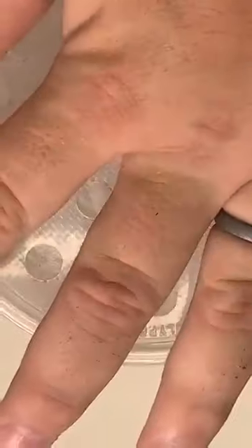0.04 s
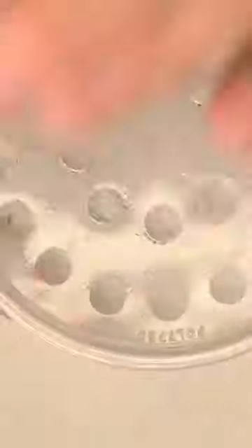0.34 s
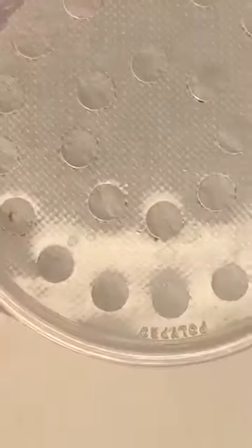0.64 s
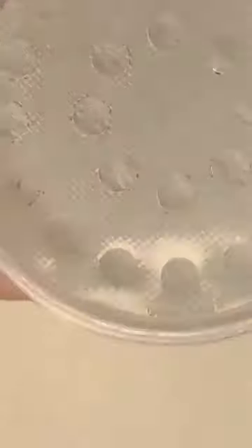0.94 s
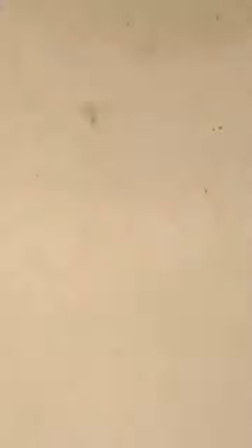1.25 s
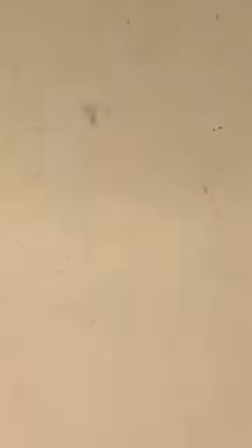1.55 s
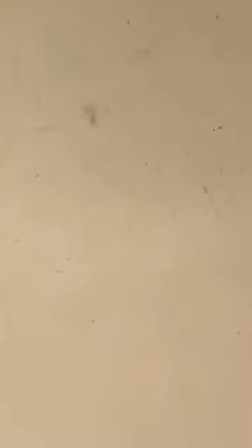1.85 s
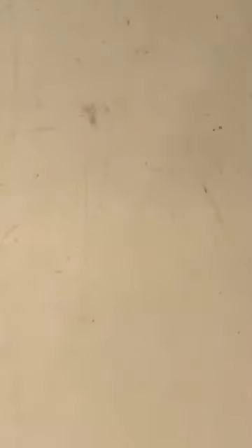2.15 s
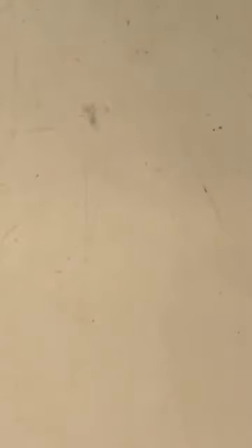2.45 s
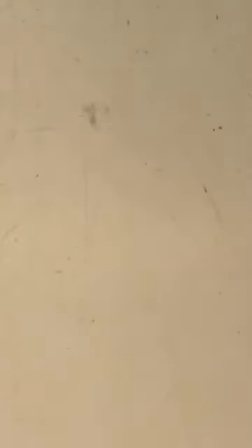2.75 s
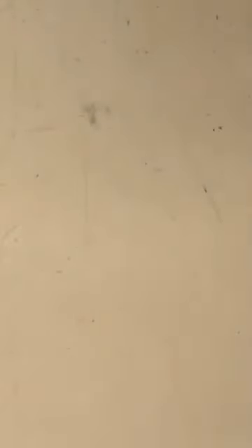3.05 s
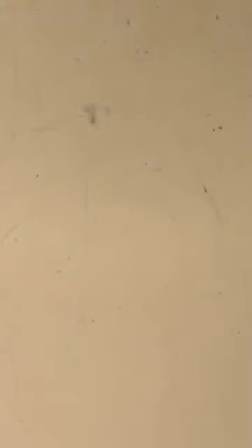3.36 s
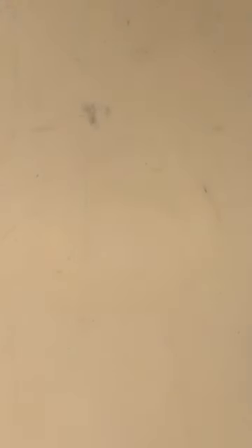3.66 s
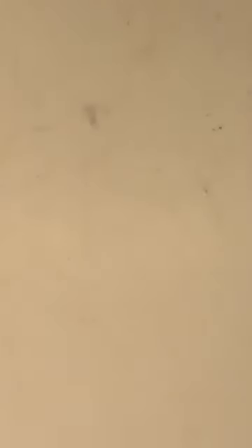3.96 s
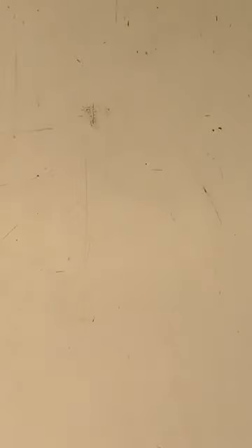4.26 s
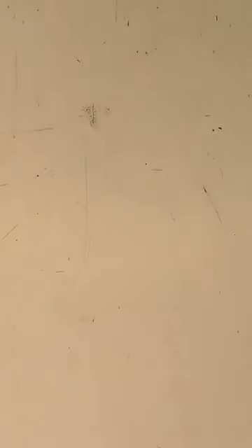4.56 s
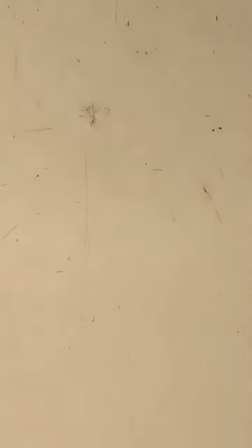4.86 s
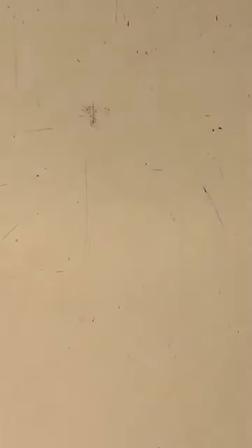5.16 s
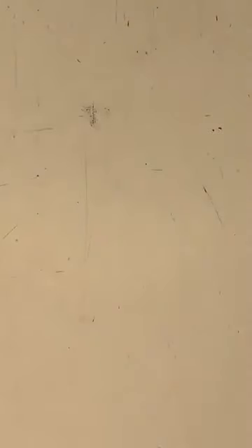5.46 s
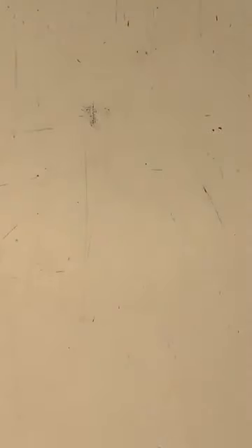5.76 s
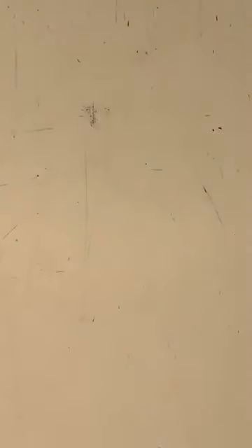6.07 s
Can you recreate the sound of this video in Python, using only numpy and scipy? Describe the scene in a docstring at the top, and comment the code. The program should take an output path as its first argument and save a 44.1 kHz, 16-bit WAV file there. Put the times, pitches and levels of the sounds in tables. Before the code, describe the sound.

In a small room with a low electrical hum, hands work a thin plastic cup close to the microphone. Skin brushes across its lid, which then lands with a light clack. Four louder clicks come from the rim, ending in a bright snap and a quick, hollow rattle. Soft sliding follows, and a cluster of duller knocks as the cup is put down.

```python
"""A thin plastic cup with a perforated lid, handled close to one microphone in a small, quiet room.
A palm drags off the lid, the lid is laid down, the rim is worked in four clicks, the last a sharp
snap, and the cup rattles and is set down. Each knock rings the hollow cup, its flexing wall and its
stiff rim. In between, skin and plastic slide softly and squeak; a mains appliance hums behind."""
import sys
import numpy as np
from scipy import signal
from scipy.fft import rfft, irfft, next_fast_len
from scipy.io import wavfile

SR = 44100
rng = np.random.default_rng(int(sys.argv[2]) if len(sys.argv) > 2 else 0)


def unload_wav(signal):
    """Save mono or channel-first audio to the path in sys.argv[1] as 16-bit WAV at rate SR, clipped to [-1, 1]."""
    wavfile.write(
        sys.argv[1],
        SR,
        np.round(np.clip(np.atleast_2d(signal).T, -1, 1) * 32767).astype(np.int16),
    )


N = 273400

# registers of a knock: thud, wall knock, low clack, high clack, rim crack (low [Hz], high [Hz], t60 [s])
REGISTER_BANDS = [(82.4, 359, 0.12), (354, 1025, .12), (929, 1650, 0.069), (1624, 2800, 0.12),
                  (2907, 15500, 0.088)]


def from_db(db):
    return 10 ** (np.asarray(db) / 20)


def rms_one(x):
    return x / np.sqrt(np.mean(x ** 2) + 1e-20)


def at_hz(points, hz):
    """Read a curve on a log-frequency axis."""
    f, value = np.transpose(points)
    return np.interp(np.log(np.maximum(hz, 1)), np.log(f), value)


def band(x, low_hz, high_hz, order=3):
    return signal.sosfilt(signal.butter(order, [low_hz, high_hz], "band", fs=SR, output="sos"), x)


def dying(t, t60):
    return np.exp(-np.log(1000) * t / t60)


def coloured(x, spectrum, peaks=()):
    """Give a steady noise a broad colour with resonances on top, at rms 1."""
    size = next_fast_len(len(x))
    hz = np.arange(size // 2 + 1) * SR / size
    lift = 1 + sum(from_db(db) / (1 + (2 * (hz - f) / width) ** 2) for f, width, db in peaks)
    return rms_one(irfft(rfft(x, size) * from_db(at_hz(spectrum, hz)) * lift, size)[:len(x)])


def drift(per_s, size):
    """A random wander around zero with a spread of about 1."""
    steps = np.arange(size) * per_s / SR
    return np.interp(steps, np.arange(size), rng.standard_normal(size))


def unit_blow(x):
    """Scale a blow to rms 1 over its first 30 ms."""
    head = int(.03 * SR)
    return x / np.sqrt(np.mean(x[..., :head] ** 2, axis=-1, keepdims=True) + 1e-20)


def add(out, s, sound):
    at = int(s * SR)
    out[at:at + len(sound)] += sound[:max(len(out) - at, 0)]


def swell(peak_s, rise_s, fade_s, depth_db=23, fade_curve=1.42):
    """Gain of a slide: it gathers speed along a bell curve and slows with a longer tail."""
    t = np.arange(N) / SR - peak_s
    away = (np.maximum(-t, 0) / rise_s) ** 2 + (np.maximum(t, 0) / fade_s) ** fade_curve
    return from_db(-depth_db * np.minimum(away, 10))


def background(air_db=-62, hum_gain_db=0.75, waver_db=1.8):
    """Room tone: an appliance hums on the mains over the soft rush of the air."""
    # tones of the hum (frequency [Hz], level before the hum gain [dB])
    hum_tones = [(60, -73), (119.5, -64.5), (199, -74), (240, -66.5), (346, -71.5), (479, -85.5),
                 (598, -76.5)]
    # colour of the room's rush (frequency [Hz], relative level [dB])
    air_colour = [(18, -33), (35, -6), (70, -7), (130, -7), (300, -9), (420, -10.5), (600, -17), (850, -20),
                  (1400, -34), (2600, -42.5), (4000, -41.5), (7000, -46), (11000, -48), (16000, -53)]
    t = np.arange(N) / SR
    hum = sum(from_db(db + waver_db * drift(4.3, N)) * np.sin(2 * np.pi * (hz * t + rng.random()))
              for hz, db in hum_tones)
    air = coloured(rng.standard_normal(N), air_colour)
    return np.sqrt(2) * from_db(hum_gain_db) * hum + from_db(air_db) * air


def palm(body_db=3.5, flicker_db=2.5):
    """The dragging palm shakes the lid, and its hiss rings in the narrow, changing gap beneath it."""
    # three pushes (fastest moment [s], rise [s], fade [s], rumble [dB], hollow scrape [dB])
    pushes = [(0.04,0.34,0.1,-45,-57.5), (0.3,0.21,0.17,-54.5,-64.5), (0.485,0.16,0.09,-55.5,-59.5)]
    # resonances of the gap (frequency [Hz], width [Hz], relative level [dB])
    gap_peaks = [(1170, 790, 0), (2420, 490, -3.5), (3580, 280, 2), (4200, 470, -7), (5350, 520, -9),
                 (5920, 420, -6), (7020, 300, -15), (7500, 270, -9), (9150, 870, -23), (10750, 900, -20)]
    skin = rng.standard_normal(N)
    body = rms_one(band(skin, 240, 440, order=2))
    rumble = rms_one(rms_one(band(skin, 85, 135, order=2)) + from_db(body_db) * body)
    scrape = rms_one(sum(from_db(db + flicker_db * drift(35, N))
                         * band(skin, hz - width / 2, hz + width / 2) for hz, width, db in gap_peaks))
    return sum(swell(s, rise_s, fade_s) * (from_db(rumble_db) * rumble + from_db(scrape_db) * scrape)
               for s, rise_s, fade_s, rumble_db, scrape_db in pushes)


def sliding(scrape_db=-3, hiss_db=-1, sizzle_db=-20, flutter_db=1.5):
    """Friction is a dense run of tiny catches; a lighter, faster stroke trades scrape for fine sizzle."""
    # skin and plastic sliding (fastest moment [s], rise [s], fade [s], strength [dB], brightness [dB])
    strokes = [(0.01,0.063,0.25,-54,1), (0.09,0.012,0.019,-43,6.5), (0.33,0.099,0.058,-60.5,-8.5),
               (0.804,0.059,0.12,-66,-5), (0.9,0.14,0.09,-76,-12), (1.24,0.16,0.13,-84,-12.5),
               (1.405,0.039,0.092,-67,-3.5), (1.752,0.048,0.31,-58,-0.5), (2.22,0.1,0.42,-68,-2.5),
               (2.585,0.072,0.15,-66,-3.5), (2.785,0.064,0.15,-66,-5), (3.12,0.23,0.16,-78.5,-9),
               (3.304,0.06,0.56,-56,1.5), (4.425,0.11,0.11,-60,12.5), (4.59,0.13,0.16,-72,-3.5),
               (4.72,0.079,0.1,-59.5,5), (5.025,0.094,0.13,-60,0), (5.52,0.13,0.13,-59.5,5.5),
               (5.65,0.15,0.36,-57,3), (5.885,0.051,0.15,-54.5,4.5), (5.98,0.2,0.11,-59.5,-5.5),
               (6.03,0.073,0.075,-55.5,11.5), (6.19,0.03,0.06,-65.5,0.5)]
    # colour of the friction (frequency [Hz], relative level [dB])
    rub_colour = [(300, 11.5), (900, 6.5), (1600, 4), (2600, 4), (3600, 3.5), (6500, -1), (8000, -7),
                  (10000, -15.5), (15000, -20)]
    # the lid's resonance under a finger (frequency [Hz], width [Hz], level against the colour [dB])
    rub_peaks = [(2570, 380, -4.5)]
    catches = coloured(rng.standard_normal(N), rub_colour, rub_peaks)
    scrape = from_db(scrape_db) * rms_one(band(catches, 816, 3700))
    hiss = from_db(hiss_db) * rms_one(band(catches, 3100, 9400))
    sizzle = from_db(sizzle_db) * rms_one(band(catches, 9400, 14800))
    swells = [(from_db(db) * swell(s, rise_s, fade_s), bright_db)
              for s, rise_s, fade_s, db, bright_db in strokes]
    out = np.zeros(N)
    for friction, tilt in ((scrape, -1), (hiss, 0), (sizzle, 1.2)):
        power = sum((gain * from_db(tilt * bright_db)) ** 2 for gain, bright_db in swells)
        out += friction * np.sqrt(power)
    return out * from_db(flutter_db * drift(90, N))


def crowded_modes(low_hz, high_hz, count=5):
    """The crowded modes of thin plastic within one register, as a few narrow strands of noise."""
    # broad response of the plastic (frequency [Hz], relative level [dB])
    plastic_colour = [(60, -2), (120, -1), (280, 4), (550, 9.5), (950, 1.5), (1600, -2), (2700, -6),
                      (3900, -7.5), (5200, -8.5), (8100, -16.5), (9000, -17), (12500, -19.5),
                      (15500, -27.5)]
    # resonances of wall and lid (frequency [Hz], width [Hz], level against the broad response [dB])
    lid_peaks = [(1300, 93, -3), (2350, 120, -3), (5900, 140, 0), (7270, 130, -2), (7930, 100, 5)]
    edges = np.geomspace(low_hz, high_hz, count + 1)
    plastic = coloured(rng.standard_normal(2 * SR), plastic_colour, lid_peaks)
    return np.array([band(np.roll(plastic, rng.integers(SR)), low, high, order=2)
                     for low, high in zip(edges, edges[1:])])


def cup_ring(t, flex_s, hollow_hz, spot_hz, spot_db, grip_spread_db=3, merge_hz=22, wobble=.012):
    """Hollow modes and wall modes, each set led by one tone, waver in pitch and die once flexing ends."""
    # the cup with its enclosed air (frequency [Hz], relative level [dB], t60 [s])
    cup_modes = [(115.5, -18.5, 0.3), (160, -14.5, 0.25), (189, -15.5, 0.18), (352.4, -11, 0.045),
                 (448.6, -5.5, 0.21), (495.5, -6.5, 0.14), (550.4, -5.5, 0.085), (605, -9, 0.088),
                 (706, -15.5, 0.2), (757, -10, 0.14), (825, -10.5, 0.14), (991, -16.5, 0.16)]
    leads = [(hollow_hz, 0, .11), (spot_hz, spot_db, .18)]  # same columns
    rings = []
    for (low, high, _), lead in zip(REGISTER_BANDS, leads):
        others = [mode for mode in cup_modes
                  if low < mode[0] < high and abs(mode[0] - lead[0]) > merge_hz]
        hz, db, t60 = np.transpose([lead] + others)[:, :, None]
        bend = 1 + wobble * np.array([drift(70, len(t)) for _ in cup_modes])[:len(hz)]
        # the grip damps different modes at every contact; the leading tone keeps its strength
        grip, start = rng.standard_normal((2, len(cup_modes), 1))[:, :len(hz)]
        grip[0] = 0
        phase = 2 * np.pi * (hz * np.cumsum(bend, axis=1) / SR + start)
        fall = dying(np.maximum(t - flex_s, 0), t60)
        rings.append((from_db(db + grip_spread_db * grip) * np.sin(phase) * fall).sum(0))
    return rings


def rim_ring(t, rise, low_hz, high_hz):
    """The stiff rim rings with clear tones within one register."""
    # modes of the rim (frequency [Hz], level against their register [dB], t60 [s])
    rim_modes = [(1410, -11.5, .08), (1633, -13.5, 0.14), (2025, -16.5, 0.21), (2903, -20, .13),
                 (3880, -22.5, .12), (5260, -17.5, 0.053), (6000, -16.5, 0.044), (6357, -17.5, .05),
                 (6500, -20.5, .05), (7150, -18, 0.056), (7850, -17.5, .045)]
    phases = rng.random(len(rim_modes))
    return sum(from_db(db) * unit_blow(np.sin(2 * np.pi * (hz * t + phase)) * rise * dying(t, t60))
               for (hz, db, t60), phase in zip(rim_modes, phases) if low_hz <= hz < high_hz)


def contacts(grit_db=-1, crackle_db=-13.5, crackle_t60=0.22):
    """The rim gives way in tiny slips and crackles as it settles; low modes hold as the wall flexes."""
    # knocks and clicks (time [s], strength [dB], brightness [dB], contact time [ms], flexing time [ms],
    # extra thud [dB], hollow tone [Hz], tone of the touched spot [Hz], its relative level [dB])
    knocks = [(0.0,-55.5,16,1.8,6.2,6,310,457,-9), (0.033,-62.5,18,1.6,5,-4,340,626,-8),
              (0.078,-54.5,14,4.4,5.9,10,325,391,-3), (0.289,-58,-13,3,8,-5,276,445,-13),
              (0.314,-56,-5,1.7,6.1,4,350,452,-11), (0.333,-56.5,7,1.2,6.9,2.5,427,496,-9),
              (1.652,-62,-11,4.5,4.6,5,284,395,-10), (2.162,-48,11.5,2,4,2.5,411,873,-7),
              (2.737,-47.5,-14.5,1,4.3,-6,344,501,-1), (3.116,-56.5,-11,0.6,4.6,-7,374,455,6),
              (3.365,-30,-3.5,2.5,17,-3,254,551,2.5), (3.495,-28,4,1.65,8,-2.5,277.7,458.4,-2),
              (3.668,-30,5,2.2,19,2.5,277.5,749,-4), (3.829,-31,19,2.5,33,4,269.6,551,0.5),
              (3.951,-34,8,1.4,29,1.5,272,991,-5.5), (3.992,-39.5,-1,1.9,11,1,282,755,-4),
              (4.027,-44,-8,2.1,9,1,270,477,8), (4.093,-47.5,10,10.8,46,3,265,545,-11),
              (4.143,-40,3,5.2,16,0.5,266,495,-1), (4.217,-40.5,7.5,5.4,4.7,5.5,260,505,-4),
              (4.233,-32.5,-4.5,2,18,-6,250.6,500,2), (4.289,-43,4,4.7,7.3,-8,327,514,-2),
              (4.325,-38.5,-7,1.5,14,-0.5,266.5,490,7), (4.42,-47,-6.5,2.2,15,2.5,262,493,3),
              (4.712,-60.5,12.5,3.3,8.3,-6,215,400,-5), (5.435,-36.5,-12,4,17,-8,269,599,1.5),
              (5.466,-40,-15,1.8,10,-6.5,346,848,-4), (5.653,-45.5,-5,5.3,11,4,259,370,1),
              (5.689,-37.5,-2.5,4.3,27,0.5,263,594,-7), (5.719,-39.5,-18,3.4,14,-3.5,340.6,479,-7),
              (5.851,-42,-4.5,4,21,3,253.7,383,-2), (5.886,-41.5,-13.5,3.8,24,0,242,478.4,5),
              (5.918,-47.5,-11,2.7,13,-3,244,493,8), (5.955,-51,-4,2.4,8,4,243,602,-4),
              (6.111,-71.5,13.5,1,5,6,430,497,-5)]
    # how a knock feeds each register (level against its strength [dB], share of its brightness [ratio])
    balance = [(-1.5, -0.31), (-0.83, 0.021), (-9.5, 0.28), (-13, 0.65), (-14, 0.94)]
    # thud and wall knock: build-up in contact times, levels of their crowded and clear modes
    lags, crowd_db, clear_db = (3.3, 1.5), (-8.5, -5), (-0.6, -1.8)
    t = np.arange(SR // 4) / SR
    out = np.zeros(N)
    strands = [crowded_modes(low, high) for low, high, _ in REGISTER_BANDS]
    settling = from_db(crackle_db) * dying(t, crackle_t60)
    offset_db, share = np.transpose(balance)
    for s, db, bright_db, contact_ms, flex_ms, thud_db, hollow_hz, spot_hz, spot_db in knocks:
        contact_s, flex_s = contact_ms / 1000, flex_ms / 1000
        levels = db + offset_db + share * bright_db
        levels[0] += thud_db
        start = rng.integers(SR // 2, SR)
        slips = from_db(grit_db * drift(1100, len(t)))
        since_burst = np.maximum(t - 3.4 * contact_s, 0)
        rings = cup_ring(t, flex_s, hollow_hz, spot_hz, spot_db)
        for k, (low, high, t60) in enumerate(REGISTER_BANDS):
            hollow = k < len(rings)
            if hollow:
                rise = 1 - np.exp(-(t / (contact_s * lags[k])) ** 2)
                fall = dying(np.maximum(since_burst - flex_s / 2, 0), t60)
            else:
                rise = 1 - np.exp(-(t / contact_s) ** 2)
                fall = np.hypot(dying(since_burst, t60), settling) * slips
            struck = unit_blow(strands[k][:, start:start + len(t)] * rise * fall)
            crowd = unit_blow(strands[k].std(axis=1) @ struck)  # each strand gets its share of the blow
            if hollow:
                blow = from_db(crowd_db[k]) * crowd + from_db(clear_db[k]) * unit_blow(rings[k] * rise)
            else:
                blow = crowd + rim_ring(t, rise, low, high)
            add(out, s, from_db(levels[k]) * unit_blow(blow))
    return out


def ticks(attack_s=0.00086, t60=0.027):
    """The lid's edge springs free; the grip stops the small ring at once."""
    # holes and edge flick under the fingertips and crack over the rim
    # (time [s], level [dB], centre [Hz], width [octaves])
    flicks = [(0.04,-52,3260,0.77), (0.08,-50,2700,1.06), (0.316,-56,2000,1.8), (0.335,-64,2330,2.3),
              (0.706,-70,5500,0.55), (1.251,-71.5,1770,1.2), (1.64,-75,4100,0.91), (1.656,-72.5,4020,1),
              (1.662,-72.5,2460,0.29), (1.666,-68,840,0.59), (1.692,-66.5,1240,0.32), (1.694,-76,2100,.6),
              (1.732,-65,1300,0.65), (3.3658,-51,5730,0.62), (3.499,-43.5,6500,0.96),
              (3.6695,-48.5,6000,2.1), (3.677,-52,5500,1), (3.832,-26.5,6900,.9), (3.832,-31.5,2960,0.77),
              (3.839,-44,5960,1.2), (4.221,-53,3000,2.3), (4.236,-47,3500,2.1), (3.116,-68,1380,2.2),
              (5.856,-58.5,1420,0.34)]
    t = np.arange(SR // 10) / SR
    out = np.zeros(N)
    for s, db, hz, octaves in flicks:
        flick = rng.standard_normal(len(t)) * (1 - np.exp(-t / attack_s)) * dying(t, t60)
        half = 2 ** (octaves / 2)
        add(out, s, from_db(db) * unit_blow(band(flick, hz / half, hz * half, order=2)))
    return out


def squeaks(spread=1.12):
    """A fingertip sticks and slips into a short, unsteady tone; uneven slips smear its pitch."""
    # (time [s], length [s], start pitch [Hz], end pitch [Hz], level [dB], roughness [0-1], waver [ratio])
    stick_slips = [(0.704, 0.016, 4600, 4760, -65.5, 0.2, .03), (0.706, 0.016, 5150, 5300, -65.5, 0.2, .03),
                   (0.708, 0.016, 5750, 5900, -71, 0.3, .03), (0.707, 0.016, 7450, 7600, -77, 0.4, .02),
                   (2.621, 0.052, 435, 515, -49.5, 0.2, .06), (2.740, 0.05, 480, 470, -51.5, 0.1, .05),
                   (3.03, .045, 6200, 6500, -78, .03, .01), (3.11, .045, 7200, 6700, -81, .05, .01),
                   (3.14, .06, 6650, 6250, -74, .03, .01), (3.195, .045, 5950, 5550, -78, .03, .01),
                   (5.295, .075, 6450, 6650, -82, .03, .01)]
    out = np.zeros(N)
    for s, length, start_hz, end_hz, db, rough, waver in stick_slips:
        size = int(length * SR)
        hz = np.linspace(start_hz, end_hz, size) * (1 + waver * drift(1100, SR)[:size])
        tone = rms_one(np.sin(2 * np.pi * np.cumsum(hz) / SR))
        smear = rms_one(band(rng.standard_normal(SR), start_hz / spread, end_hz * spread, order=2)[-size:])
        squeak = np.sqrt(1 - rough) * tone + np.sqrt(rough) * smear
        add(out, s, from_db(db) * rms_one(np.hanning(size)) * squeak)
    return out


def lid_drop(at_s=2.164, level_db=-36.5, settle_s=0.0016):
    """The lid lands flat and its disc modes ring briefly."""
    # modes of the loose lid (frequency [Hz], relative level [dB], t60 [s])
    lid_modes = [(130, -20, 0.2), (189, -10, 0.19), (264, -3, 0.094), (320, 2.5, 0.049), (386, 6, 0.049),
                 (447, 0, 0.057), (860, 1.5, 0.026), (1088, -9, 0.055), (1170, 2.5, 0.029),
                 (1280, -8, 0.027), (2484, -4, 0.036)]
    t = np.arange(SR // 3) / SR
    ring = sum(from_db(db) * np.sin(2 * np.pi * (hz * t + rng.random())) * dying(t, t60)
               for hz, db, t60 in lid_modes)
    rise = 1 - np.exp(-(t / settle_s) ** 2)
    out = np.zeros(N)
    add(out, at_s, from_db(level_db) * unit_blow(ring * rise))
    return out


def room(x, build_s=0.0096):
    """The bare walls of the small room return a short, dense tail."""
    # decay of the room (frequency [Hz], t60 [s])
    decay = [(150, 0.26), (500, 0.3), (1200, 0.46), (3000, 0.41), (7000, 0.38), (14000, 0.4)]
    wet = [(200, -3.5), (1500, -4), (6000, -9.5), (13000, -7.5)]  # (frequency [Hz], level [dB])
    t = np.arange(SR * 3 // 5) / SR
    build = 1 - np.exp(-(t / build_s) ** 2)
    edges = np.geomspace(80, 18000, 9)
    response = np.zeros(len(t))
    for low, high in zip(edges, edges[1:]):
        hz = np.sqrt(low * high)
        tail = band(rng.standard_normal(len(t)), low, high) * dying(t, at_hz(decay, hz)) * build
        unity_gain = np.sqrt(2 * (high - low) / SR / len(t))
        response += from_db(at_hz(wet, hz)) * rms_one(tail) * unity_gain
    return signal.fftconvolve(x, response)[:N]


def scene(rub_room_db=-7):
    """Cup and lid close up over the room tone; the rubbing is nearest the microphone and driest."""
    knocks = contacts() + ticks() + lid_drop() + squeaks()
    rubs = sliding() + palm()
    reverb = room(knocks + from_db(rub_room_db) * rubs)
    return (knocks + rubs + reverb + background())[None]


def record(dry, overload=.42, cutoff_hz=15900):
    """The recorder rounds the highest peaks and cuts the top steeply."""
    rounded = dry / (1 + (dry / overload) ** 4) ** (1 / 4)
    return signal.sosfilt(signal.ellip(10, .2, 80, cutoff_hz, fs=SR, output="sos"), rounded)


dry = scene()
out = record(dry)
unload_wav(out)
```